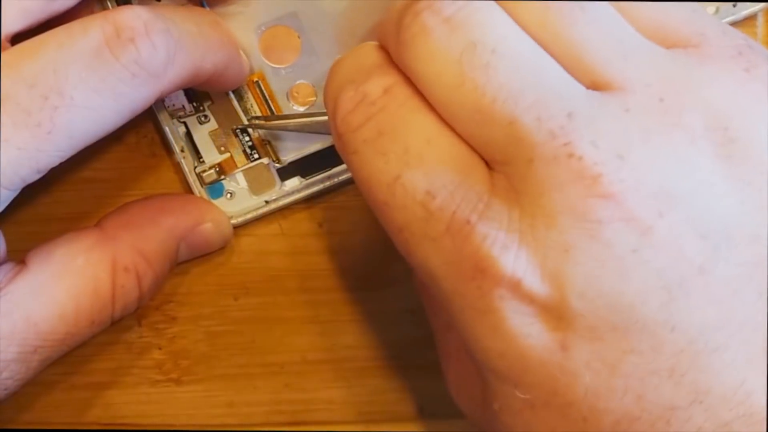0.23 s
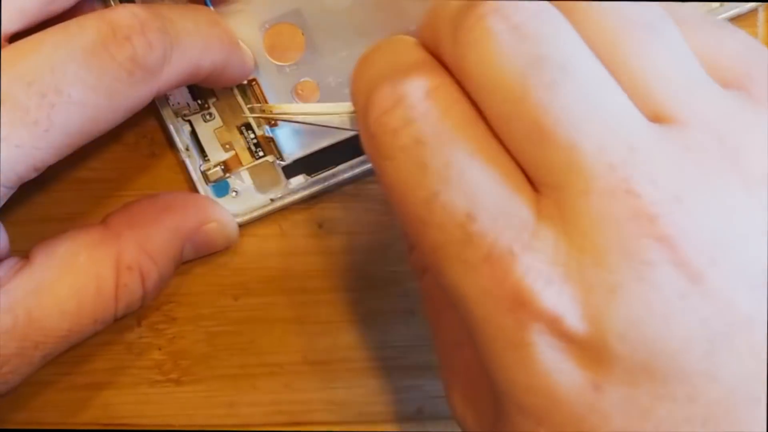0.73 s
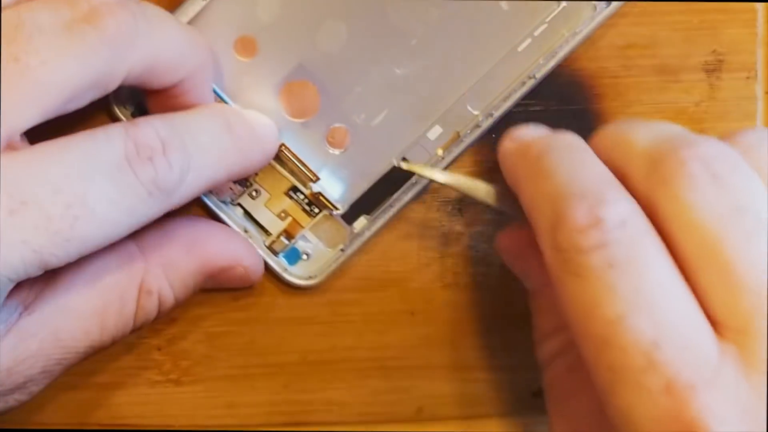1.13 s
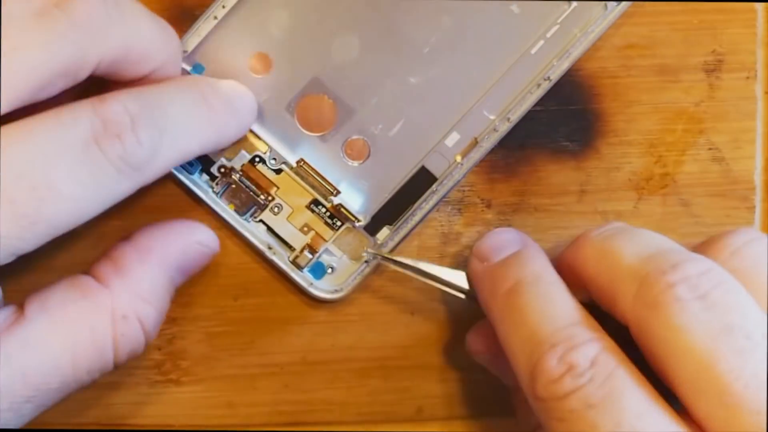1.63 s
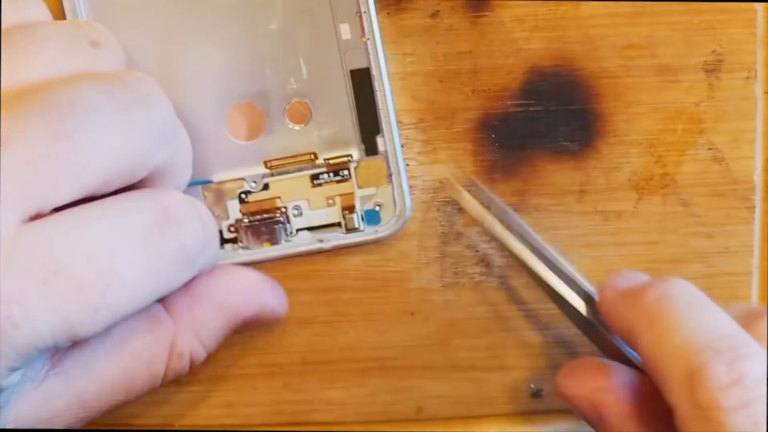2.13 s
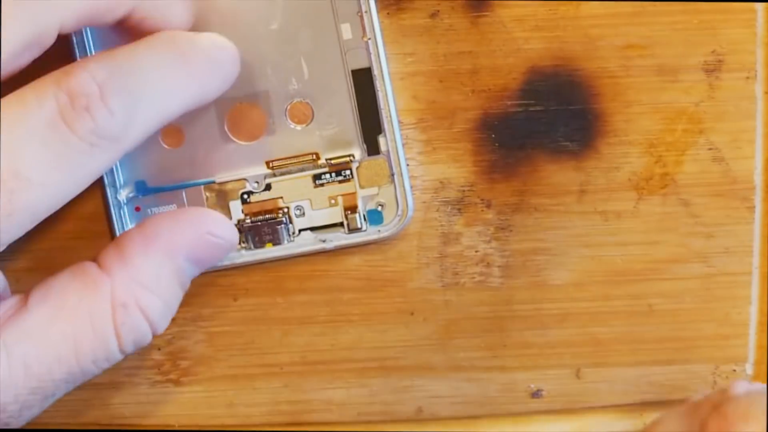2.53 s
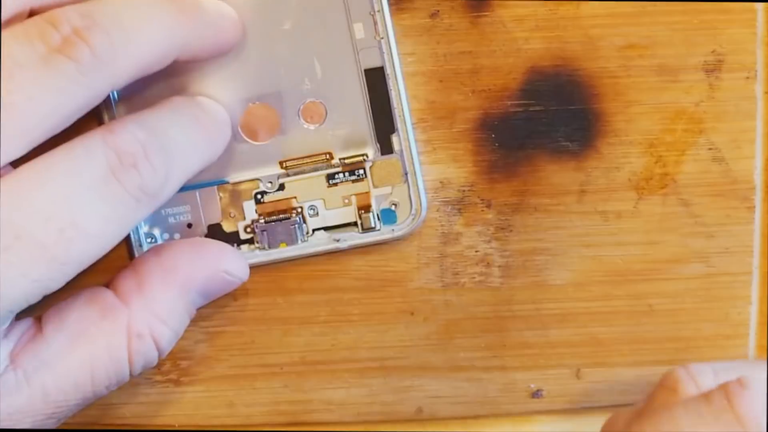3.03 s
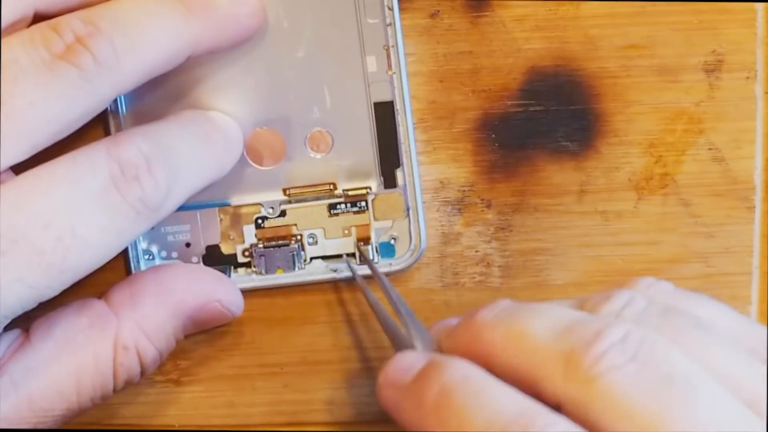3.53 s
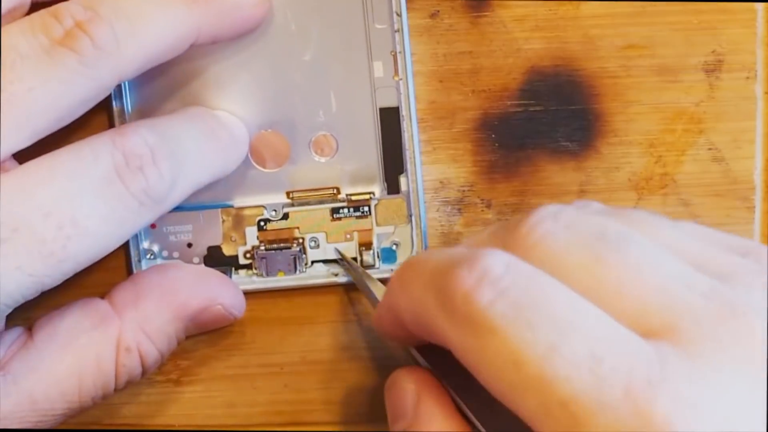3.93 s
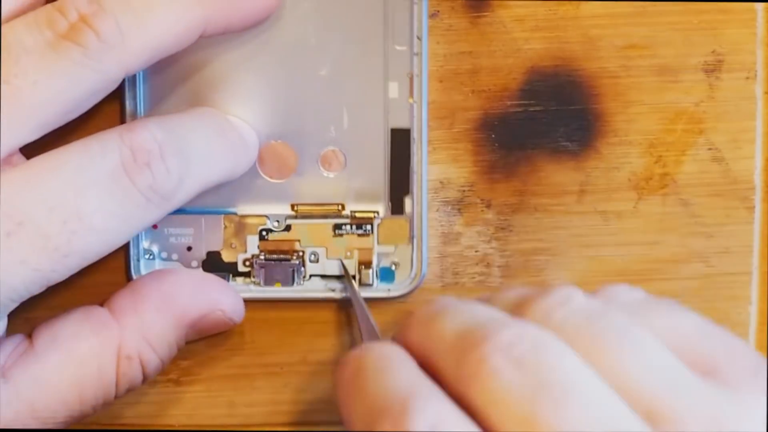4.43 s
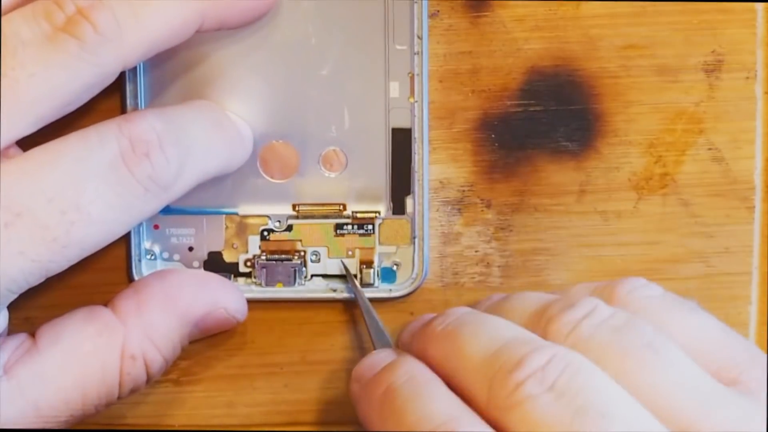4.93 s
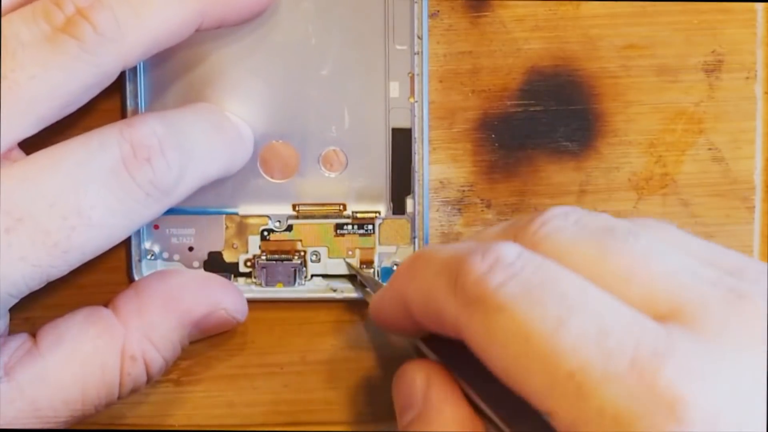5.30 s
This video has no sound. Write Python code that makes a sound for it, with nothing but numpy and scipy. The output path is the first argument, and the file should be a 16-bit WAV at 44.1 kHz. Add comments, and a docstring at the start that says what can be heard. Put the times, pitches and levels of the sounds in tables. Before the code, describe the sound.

Faint low motor hum and room air run throughout, in a small room with a short diffuse tail. A soft low bench bump at 0.15 s precedes a bright, dry clip snap at 0.4 s, with a faint click at 0.6. A deeper bump at 0.7 leads into the loudest passage: from 0.8 to 1.1 s the metal frame is pushed over wood with a hollow, juddering, gritty scrape, with a strong dull clack at 0.85. A crisp snap comes at 1.26, then light steel ticks. Around 1.85 a bump begins the turning of the frame, a shorter crackling scrape strongest at 2.05-2.2 s with a snap at 2.07. A faint click at 2.3 and soft thump at 2.4 follow. Then it is sparse: a tick and tiny scuff near 3.25, dull finger rubs, a faint click at 4.27, a small ringing click cluster at 4.43-4.49, and near silence with one minute tick at 5.54.

```python
"""A low motor hum and faint room air come first, then a soft bump of the bench and the bright snap of a clip.
Steel tweezers pry at a clipped part in a thin metal phone frame, close to the microphone: each snap excites
damped metal modes, a sprung part and a broad crack, and the tips tick and scuff by impact and friction.
Twice the frame is dragged over the wooden bench: stick-slip jerks drive its body modes and crackling grit.
Hands bump and rub the bench as slow swings and dull noise; a small room answers with a diffuse tail."""
import sys
import numpy as np
from scipy import signal
from scipy.fft import rfft, irfft
from scipy.io import wavfile
from scipy.ndimage import uniform_filter1d

SR = 44100
rng = np.random.default_rng(int(sys.argv[2]) if len(sys.argv) > 2 else 0)


def unload_audio(sound):
    """Save the sound as a 16-bit wav file, at the path given as the first command line argument."""
    columns = np.transpose(np.atleast_2d(sound))
    # keep every value between -1 and 1, then stretch to whole-number steps
    steps = np.round(np.clip(columns, -1, 1) * 32767)
    wavfile.write(sys.argv[1], SR, steps.astype(np.int16))


N = 245240
T = np.arange(N) / SR  # time, s
TOP_HZ = 15900  # upper limit of the recorder and of the snap spectrum

# Snaps of clip and tweezers against the frame, and two hard catches of the frame on the wood as the push begins
# (0.80 s) and during the turn (2.07 s). Each row: start in seconds, level in dB, tilt in dB per octave, #
# treble edge in Hz, chatter decay in seconds, frequency ratio of the metal modes, relative send to the room in
# dB, # sprung part in Hz, its level in dB, its buzz decay in seconds.
SNAPS = [(0.4014, -28, -0.6, 16200, 0.0016, 1.0, 1.5, 2660, -28, 0.0011),
         (0.6039, -55, -2, 5470, 0.014, 0.97, -3, 2850, -59, 0.012),
         (0.7967, -50, -9.5, 12000, 0.0054, 1.0, 14, 1170, -55, 0.011),
         (0.8544, -31, -9, 11000, 0.00053, 0.97, 2, 563, -29, 0.024),
         (1.2565, -41, -0.23, 8840, 0.0015, 0.95, 0, 4000, -44, 0.0018),
         (2.0701, -40, -2.5, 11920, 0.0036, 1.0, -1, 4100, -44, 0.0026),
         (2.325, -51.5, -4.5, 6400, 0.0029, 0.96, -0.5, 1207, -53, 0.039),
         (4.2672, -59, -0.2, 13060, 0.0055, 0.84, -5.5, 900, -51, 0.03),
         (4.4717, -51, -1, 8900, 0.00099, 1.0, -7, 2410, -43.5, 0.0017)]
# Modes of frame and tweezers. Each row: frequency in Hz before the snap's frequency ratio, width in Hz of the
# sharper of two resonators, relative level in dB.
METAL_MODES = [(536.3, 52, -7), (955, 41, -8.5), (1114, 120, -7.5), (1276, 60, -10.5), (1470, 100, -12.5),
               (2180, 590, -11.5), (2776, 200, -7.5), (3200, 490, -12), (3890, 780, -12), (4260, 870, -9.5),
               (6730, 300, -13), (7870, 400, -7), (10600, 1100, -5), (13960, 450, -2)]
# Spectrum of the broad crack. Each row: frequency in Hz, relative level in dB.
CRACK_COLOUR = [(100, 1), (250, 3.5), (600, 4), (1300, 2.5), (1800, -0.5), (3000, 2.5), (5800, -10.5),
                (8000, -11.5), (11000, -6), (15500, -10.5)]
PART_Q, PART_TO_ROOM_DB = 6.5, -5  # sharpness of a sprung part's ring; its share sent to the room
RINGS_TO_ROOM_DB, CRACK_TO_ROOM_DB = -0.5, 3.5


def snaps():
    """Impact excitation of modes: a snap rings metal and a sprung part; returns near sound and room send."""
    near, spread = np.zeros(N), np.zeros(N)
    t = T[:SR // 4]
    for (s, snap_db, tilt_db, edge_hz, chatter_s, frequency_ratio, open_db,
         part_hz, part_db, buzz_s) in SNAPS:
        spectrum = snap_colour(snap_db, tilt_db, edge_hz)
        force = contact(chatter_s, rattle=4.3)
        rings = metal_rings(force, frequency_ratio, spectrum)
        crack = broad_crack(chatter_s, spectrum, t)
        add(near, s, rings + crack)
        # the sprung part lets go 0.8 ms later and buzzes to rest
        sprung = undb(part_db) * part(contact(buzz_s, rattle=2.7), part_hz, part_hz / PART_Q)
        add(near, s + .0008, sprung)
        # the highest modes beam at the microphone and hardly reach the walls
        unbeamed = signal.lfilter(*signal.butter(1, 2600, fs=SR), rings + undb(PART_TO_ROOM_DB) * sprung)
        to_room = undb(RINGS_TO_ROOM_DB) * unbeamed + undb(CRACK_TO_ROOM_DB) * crack
        add(spread, s, undb(open_db) * to_room)
    return near, spread


def metal_rings(force, frequency_ratio, spectrum):
    """Modal superposition: damped resonances of alternating sign, weighted by the spectrum of the blow."""
    rings = 0
    for k, (hz, width_hz, db) in enumerate(METAL_MODES):
        hz = hz * frequency_ratio
        mode = ring(ring(force, hz, width_hz), hz, hz * 0.27)
        level = undb(db + on_log(hz, spectrum))
        rings = rings + (-1) ** k * level * blow(mode)
    return rings


def broad_crack(chatter_s, spectrum, t):
    """Broadband impact: a contact crack, then sparse slips as the parts settle for hundredths of a second."""
    settle = slips(rate=1500, scatter_db=4.5)[:len(t)] * np.exp(-t / 0.022)
    crack = blow(contact(chatter_s, rattle=1.9)) + undb(-7.5) * blow(settle)
    shaped = blow(colour(np.roll(crack, 20), CRACK_COLOUR))
    return undb(-3.0) * colour(shaped, spectrum) * (t < .125)


TILT_PIVOT_HZ = 600


def snap_colour(db, tilt_db, edge_hz):
    """Contact-limited spectrum: (Hz, dB) points of a steady tilt with a steep fall above the edge."""
    hz = np.geomspace(TILT_PIVOT_HZ, TOP_HZ, 24)
    fall = 10 * np.log10(1 + (hz / edge_hz) ** 8)
    level = db + tilt_db * np.log2(hz / TILT_PIVOT_HZ) - fall
    return list(zip(hz, level))


# Touches of steel on small parts, and low knocks of the frame itself just after 4.47 s. Each row: start in
# seconds, level in dB, centre in Hz, width in Hz # of the sharper of two resonators.
TICKS = [(0.807, -62, 7000, 7000), (0.813, -59.5, 9000, 7000), (0.829, -65, 6000, 6940),
         (0.89, -65, 4500, 6000), (1.1099, -70, 6460, 6000), (1.1718, -71, 4420, 4930),
         (1.2558, -56, 13900, 2500), (1.471, -74, 910, 602), (1.667, -71.5, 3500, 1400),
         (1.7054, -60.5, 3110, 2800), (1.8997, -56.5, 4500, 5000), (2.0227, -50, 3800, 4000),
         (2.242, -64.5, 4500, 2500), (3.2212, -65, 3180, 4000), (3.2467, -51.5, 5390, 598),
         (3.536, -63, 5000, 4970), (3.607, -72.5, 6970, 6970), (3.8928, -65, 3980, 2990),
         (4.067, -74, 4500, 4010), (4.269, -59, 11170, 600), (4.3749, -71.5, 4130, 1000),
         (4.4352, -58.5, 4120, 599), (4.4560, -50.5, 4070, 450), (4.4705, -46.5, 4270, 705),
         (4.4716, -49, 7270, 900), (4.4721, -46.5, 580, 179), (4.473, -51, 960, 90),
         (5.5406, -65, 2790, 2550)]
TICK_CHATTER_S = 0.0014
OVERTONE_RATIO, OVERTONE_DB = 1.8, -17.5  # second resonance of a touched part


def ticks():
    """Impulse response of small parts: each touch excites a damped resonance and a weaker overtone."""
    out = np.zeros(N)
    for s, db, hz, width_hz in TICKS:
        force = contact(TICK_CHATTER_S, rattle=2.7)[:SR // 12]
        overtone = undb(OVERTONE_DB) * part(force, hz * OVERTONE_RATIO, width_hz)
        add(out, s, undb(db) * (part(force, hz, width_hz) + overtone))
    return out


# The frame pushed over the wood. Each row: time in seconds, relative body level in dB, relative grit level in dB.
PUSH = [(0.78, -57.5, -76), (0.812, -39, -56.5), (0.848, -41, -55.5), (0.854, -33.5, -44),
        (0.864, -31.5, -56.5), (0.9, -34.5, -46), (0.962, -37.5, -45.5), (0.976, -40.5, -57),
        (1.058, -49, -68), (1.09, -48, -75.5), (1.16, -75, -72)]
# Modes of the frame pressed flat. Each row: frequency in Hz, width in Hz of the sharper resonator,
# relative level in dB.
PUSH_BODY = [(345, 25, -11), (374, 14, -1), (418, 14, -3), (524, 20, -5), (548, 16, 2), (613, 18, -4),
             (680, 60, -11), (847, 16, -8), (925, 30, -12), (1033, 40, -11), (1135, 40, -16),
             (1223, 16, -10)]
# Grit under the pushed frame. Each row: frequency in Hz, relative level in dB.
PUSH_GRIT = [(820, -41), (1400, -4), (1730, -5), (2070, 5), (2220, 4), (2760, -5.5), (3250, -6),
             (4130, 1.5), (4680, -8), (5550, -16), (6440, -9.5), (8260, -26), (9000, -45), (11700, -54),
             (19800, -120)]


def push_frame():
    """Sliding friction under pressure: the frame lies flat, and its narrow body modes judder."""
    return drag(PUSH, PUSH_BODY, PUSH_GRIT, rate=1800, scatter_db=2, grip_db=4.0,
                body_db=0, grit_db=-0.5, fine_db=-8.5, dulling_db_per_s=30, rub_db=-11.5)


# The frame turned on the wood. Each row: time in seconds, relative body level in dB, relative grit level in dB.
TURN = [(1.82, -77.5, -87.5), (1.852, -65.5, -66.5), (1.882, -76, -65.5), (1.894, -55, -58),
        (1.98, -66.5, -52), (2.06, -39.5, -43), (2.072, -38.5, -40), (2.094, -47.5, -39),
        (2.158, -41.5, -52), (2.176, -45, -62), (2.278, -59, -70), (2.31, -62, -73)]
# Modes of the frame held loosely. Each row: frequency in Hz, width in Hz of the first of two resonators (the
# second is half the frequency wide), relative level in dB.
TURN_BODY = [(375.5, 36, 4), (429, 24, -0.5), (558, 100, 3.5), (690, 150, 0.5), (835, 105, -9.5),
             (958, 41, -4.5), (1343, 210, -8), (1610, 1400, -16.5)]
# Grit under the turning frame. Each row: frequency in Hz, relative level in dB.
TURN_GRIT = [(710, -16), (1200, -43), (1360, -6), (1720, -12.5), (2240, -1.5), (2810, -4), (3140, -2.5),
             (3410, -7.5), (4070, 3.5), (4620, -5), (5430, -3), (5900, -10.5), (6700, -6.5), (7730, -21),
             (9000, -17), (11700, -61), (19800, -120)]


def turn_frame():
    """Sliding friction under a loose hold: broad body modes, with denser and more uneven slips."""
    return drag(TURN, TURN_BODY, TURN_GRIT, rate=2600, scatter_db=3.5, grip_db=3,
                body_db=-1, grit_db=0.5, fine_db=-1, dulling_db_per_s=31, rub_db=-6.5)


# The finest grit of both drags. Each row: frequency in Hz, relative level in dB.
FINE_GRIT = [(6000, -19), (8500, -3.5), (10500, -3), (12500, 4), (14500, -10), (16000, 4.5)]
# Dull rub on the bench, by the frame and by fingers. Each row: frequency in Hz, relative level in dB.
RUB_COLOUR = [(70, -4.5), (130, -9), (220, 0.5), (310, -6.5), (430, -9), (800, -23), (1500, -40.5),
              (3000, -53)]


def drag(curve, modes, grit_colour, rate, scatter_db, grip_db,
         body_db, grit_db, fine_db, dulling_db_per_s, rub_db):
    """Stick-slip friction: jerks drive body modes and grit, whose finest part fades as the drag goes on."""
    s, *columns = np.transpose(curve)
    inside = uniform_filter1d(1. * (T > s[0]) * (T < s[-1]), SR // 100)
    body_gain, grit_gain = (inside * undb(np.interp(T, s, column)) for column in columns)
    fine_gain = grit_gain * undb(fine_db - dulling_db_per_s * np.maximum(T - s[0], 0))
    # the edge catches and lets go
    grip = unit(undb(grip_db * np.clip(walk(220), -1.7, 1.7)))
    jerks = grip * unit(slips(rate, scatter_db) + 0.54 * rng.standard_normal(N))
    body = unit(sum(undb(db) * unit(ring(ring(jerks, hz, width_hz), hz, hz * .5))
                    for hz, width_hz, db in modes))
    grit = unit(colour(jerks, grit_colour))
    fine = unit(colour(jerks, FINE_GRIT))
    rub = unit(colour(rng.standard_normal(N), RUB_COLOUR))
    judder = body_gain * (undb(body_db) * body + undb(rub_db) * rub)
    return judder + undb(grit_db) * grit_gain * grit + fine_gain * fine


# Short scuffs of steel. Each row: middle in seconds, spread in seconds, level of the rub in dB, rubbed part in Hz.
SCUFFS = [(2.917, 0.011, -72.5, 3700), (3.118, 0.013, -77, 5950), (3.225, 0.018, -70.5, 3990),
          (3.276, .014, -54, 5340), (3.883, 0.008, -64, 3970), (4.448, 0.017, -60, 4150),
          (4.485, 0.01, -55, 3950)]
# Spectrum of the scuffs before their tilt. Each row: frequency in Hz, relative level in dB.
SCUFF_COLOUR = [(900, 0), (1500, -1.5), (2050, 12), (2700, 3), (3500, 3.5), (4400, -4), (4900, -7),
                (5500, 3), (6200, -11.5), (7600, -3), (8600, -13), (9500, -17), (14000, -25)]
# The frame's edge skimming the wood as the push ends. Each row: middle in seconds, spread in seconds, level in dB.
SKIM = [(1.025, 0.031, -57.5), (1.062, 0.0078, -65)]
# Spectrum of the skimming edge. Each row: frequency in Hz, relative level in dB.
SKIM_COLOUR = [(2500, -6), (3600, -4), (4200, 2), (5300, -3), (6300, -9), (7500, -4.5), (8500, -32),
               (12000, -37)]
SCUFF_TILT_DB = 1  # per octave
SCUFF_RING_DB, SCUFF_RING_WIDTH_HZ = -4.5, 520  # ring relative to the rub


def scuffs():
    """Friction-driven resonance: dense slips of steel make parts sing, and the frame's edge skims the wood."""
    jerks = slips(rate=6000, scatter_db=5)
    octaves = np.log2(np.clip(np.fft.rfftfreq(N, 1 / SR), 1500, 9000))
    tilted = rfft(colour(jerks, SCUFF_COLOUR)) * undb(SCUFF_TILT_DB * octaves)
    rub = unit(irfft(tilted, N))
    out = swells(SKIM) * unit(colour(slips(rate=7600, scatter_db=7), SKIM_COLOUR))
    for *stroke, hz in SCUFFS:
        singing = unit(part(jerks, hz, SCUFF_RING_WIDTH_HZ))
        out += swells([stroke]) * (rub + undb(SCUFF_RING_DB) * singing)
    return out


# Hands bumping the bench. Each row: start in seconds, envelope peak in dB, frequency in Hz.
BUMPS = [(0.15, -41.5, 39), (0.394, -50, 61.6), (0.709, -33, 49.7), (1.268, -37.5, 64),
         (1.852, -33.5, 70.9), (2.412, -31.5, 73)]
# Fingers shifting their grip. Each row: middle in seconds, spread in seconds, level in dB.
RUBS = [(1.33, 0.047, -55.5), (2.5, 0.07, -54.5), (3.05, 0.062, -55), (3.645, 0.051, -51),
        (4.28, 0.019, -55), (4.49, 0.037, -54.5), (4.88, 0.058, -53.5)]
BUMP_RISE_S = 0.018
REBOUND_S, REBOUND_DB = 0.0632, -10  # the hand settles once more after each bump


def bench():
    """Damped low oscillation: soft pushes swing the bench top and rebound once; fingers rub dully."""
    out = swells(RUBS) * unit(colour(rng.standard_normal(N), RUB_COLOUR))
    t = T[:SR // 3]
    swing = (t / BUMP_RISE_S * np.exp(1 - t / BUMP_RISE_S)) ** 2
    for s, db, hz in BUMPS:
        bump = undb(db) * swing * np.sin(2 * np.pi * hz * t)
        add(out, s, bump)
        add(out, s + REBOUND_S, undb(REBOUND_DB) * bump)
    return out


# Motor hum. Each row: mean frequency in Hz, relative level in dB.
HUM = [(113.0, -63), (166.9, -66), (226.1, -61), (279.9, -69), (473.7, -76), (699.8, -83.5), (920.5, -87.5)]
# Room air and microphone hiss. Each row: frequency in Hz, relative level in dB.
AIR = [(20, -15.5), (36, -15), (55, 0.5), (95, 0.5), (160, -6.5), (250, -4.5), (480, -13), (700, -21),
       (1000, -22), (1900, -33.5), (3600, -35), (6000, -41.5), (15800, -41.5)]
AIR_DB = -59.5


def background():
    """Steady partials over shaped noise: a hum wavers in level and pitch over room air and microphone hiss."""
    hum = 0
    for hz, db in HUM:
        level = undb(db + 1.7 * walk(9.5))
        phase = 2 * np.pi * np.cumsum(hz + 1.2 * walk(6)) / SR
        hum = hum + level * np.sin(phase)
    air = unit(colour(rng.standard_normal(N), AIR))
    return undb(0.5) * hum + undb(AIR_DB) * air


# Reverberation time of the room. Each row: frequency in Hz, time to fall by 60 dB in seconds.
ROOM_T60 = [(150, 1), (500, 0.5094), (1250, 0.6), (2500, 0.49), (8000, 0.403), (15000, 0.2)]
# Spectrum of the room's answer. Each row: frequency in Hz, relative level in dB.
ROOM_COLOUR = [(100, -1.5), (500, -5), (1300, -2), (2200, -3.5), (3200, -7), (5500, -10), (8500, -4),
               (14000, -11)]


def room(x, early_db, late_db):
    """Reverberation: near surfaces answer within 30 ms; the diffuse tail loses its treble first."""
    t = T[:int(.8 * SR)]
    hz, s, cells = signal.stft(rng.standard_normal(len(t)), SR, nperseg=256)
    decay = np.exp(-np.log(1000) * s / on_log(hz, ROOM_T60)[:, None])
    tail = signal.istft(cells * decay, SR)[1][:len(t)]
    tail = tail * np.clip(t / .015, 0, 1)
    early = rng.standard_normal(len(t)) * (t > .003) * (t < .028) * np.exp(-t / 0.11)
    response = undb(early_db) * early / np.linalg.norm(early) + undb(late_db) * tail / np.linalg.norm(tail)
    return signal.fftconvolve(x, colour(response, ROOM_COLOUR)[:int(.7 * SR)])[:N]


def contact(chatter_s, rattle):
    """Contact force: a sharp first touch, then a dying random chatter of the surfaces."""
    t = T[:SR // 4]
    chatter = unit(rng.standard_normal(len(t))) * np.exp(-t / chatter_s)
    force = rattle * chatter / np.sqrt(chatter_s * SR / 2)
    force[0] += 1
    return force


def slips(rate, scatter_db):
    """Stick-slip: tiny jerks of uneven size and sign at random moments, rate per second."""
    happens = rng.random(N) < rate / SR
    size = undb(scatter_db * np.clip(rng.standard_normal(N), -2, 2))
    return unit(happens * size * rng.choice([-1, 1], N))


def part(force, hz, width_hz):
    """Damped resonance: the ring of one small part, through a sharp and a broader resonator."""
    return blow(ring(ring(force, hz, width_hz), hz, 2 * width_hz))


def ring(x, hz, width_hz):
    """Simple resonator: one mode with gain 1 at its centre."""
    q = hz / min(width_hz, SR / 4)
    return signal.lfilter(*signal.iirpeak(min(hz, SR * .45), q, fs=SR), x)


def colour(x, points):
    """Spectral shaping: filter a sound by (Hz, dB) points without delay."""
    gain = undb(on_log(np.fft.rfftfreq(len(x), 1 / SR), points))
    return irfft(rfft(x) * gain, len(x))


def on_log(hz, points):
    """Logarithmic frequency scale: read (Hz, value) points between octaves."""
    f, value = np.transpose(points)
    return np.interp(np.log(np.maximum(hz, 1)), np.log(f), value)


def walk(rate):
    """Slow fluctuation: smoothed random steps at a rate per second, with rms 1."""
    size = max(int(SR / rate), 1)
    steps = np.repeat(rng.standard_normal(N // size + 1), size)
    return unit(uniform_filter1d(steps, size)[:N])


def swells(rows):
    """Addition of powers: gain of strokes (middle s, spread s, dB) that rise and fall smoothly."""
    return np.sqrt(sum(undb(db) ** 2 * np.exp(-((T - s) / spread) ** 2) for s, spread, db in rows))


def blow(x):
    """Energy normalisation: scale a short sound to the energy of 10 ms at rms 1."""
    return x / np.sqrt(np.sum(x ** 2) / (SR / 100))


def unit(x):
    """Power normalisation: scale to rms 1."""
    return x / np.sqrt(np.mean(x ** 2) + 1e-30)


def undb(db):
    """Level definition: decibels to amplitude gain."""
    return 10 ** (np.asarray(db) / 20)


def add(out, s, x):
    """Superposition: mix a sound in at a time in seconds."""
    i = int(s * SR)
    out[i:i + len(x)] += x[:N - i]


def scene():
    """Mid-side stereo: all is close and central; a trace of the room and of noise differs between the ears."""
    push = push_frame()
    turn = turn_frame()
    hits, spread = snaps()
    friction = ticks() + push + turn + scuffs()
    mid = hits + friction
    mid = mid + room(spread, early_db=-4.5, late_db=-4.5)
    mid = mid + room(friction, early_db=-9.5, late_db=-15.5)
    mid = mid + bench() + background()
    side_room = room(hits + friction, early_db=-47.5, late_db=-42.5)
    side = colour(side_room, [(500, -32), (2500, -25), (6000, -1.0), (14000, 3.5)])
    side_noise = colour(rng.standard_normal(N), [(200, -21), (2000, -6), (10000, 6.5)])
    side = side + undb(-86.5) * side_noise
    return np.array([mid + side, mid - side])


def record(dry):
    """Band limitation: the recorder cuts the top with a steep low-pass."""
    return signal.sosfilt(signal.ellip(10, .2, 70, TOP_HZ, fs=SR, output="sos"), dry)


dry = scene()
out = record(dry)
unload_audio(out)
```